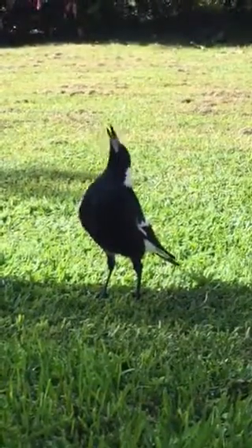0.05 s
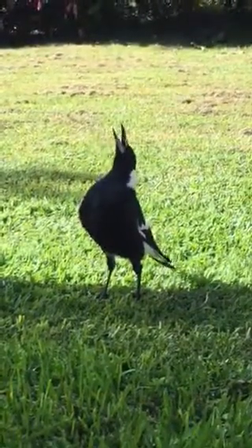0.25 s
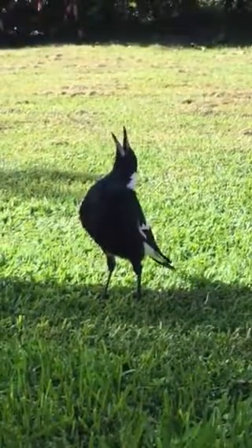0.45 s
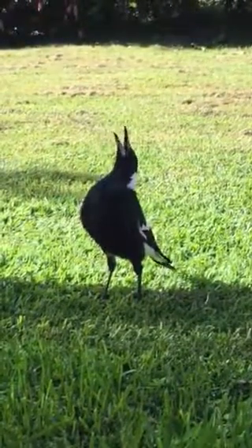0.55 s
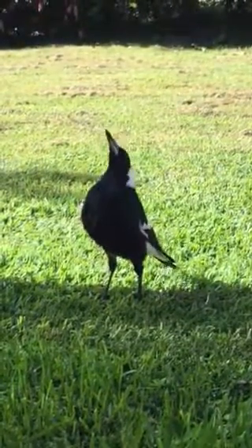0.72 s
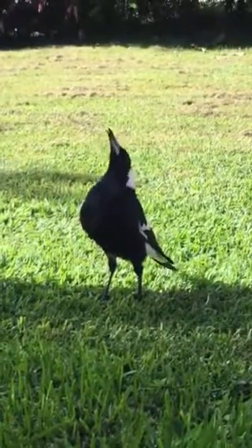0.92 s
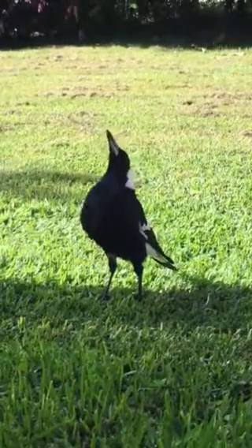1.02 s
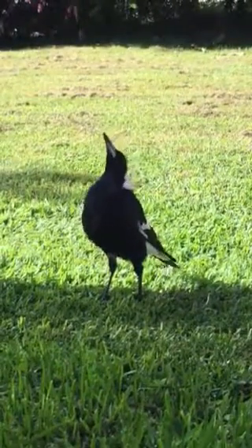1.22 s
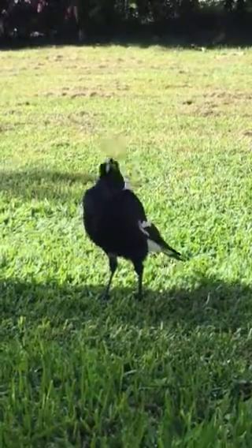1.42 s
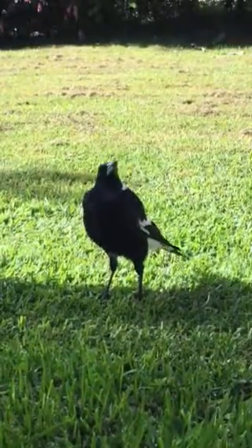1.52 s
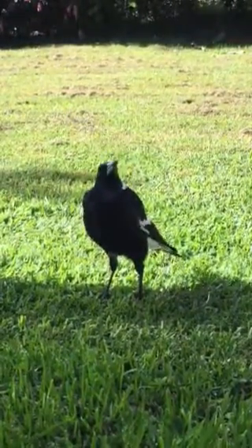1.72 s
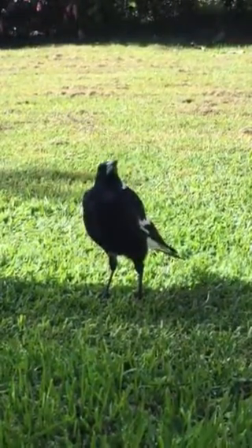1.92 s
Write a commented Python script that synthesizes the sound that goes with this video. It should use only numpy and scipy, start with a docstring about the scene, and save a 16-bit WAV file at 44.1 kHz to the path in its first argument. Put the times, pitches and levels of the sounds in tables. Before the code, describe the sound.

Loud two-voiced magpie song outdoors, short note, long fluttering phrase, soft descending end, then quiet

```python
"""Low rumble and faint hiss of a park, noise and wavering tones, lie under all; a far bird whistles first.
Then a songbird carols close by on a lawn: a short note, a long two-voiced phrase and a softer falling note.
The two sides of its syrinx sing a little apart; their coupling gives a flutter and clusters of overtones.
Sparse dull reflections follow the song."""
import sys
import numpy as np
from scipy import signal
from scipy.io import wavfile
from scipy.ndimage import uniform_filter1d

SR = 44100
rng = np.random.default_rng(int(sys.argv[2]) if len(sys.argv) > 2 else 0)


def invert_db(x):
    """Field ratio 10**(x/20) for x, a level in decibels (scalar or array-like)."""
    u = np.asarray(x, float) / 20
    return 10 ** u


def dump_mix(stems):
    """Bounce the given channels to the path in sys.argv[1] as a 16-bit WAV at rate SR."""
    frames = np.atleast_2d(stems).T  # one column per channel
    limited = np.clip(frames, -1, 1)  # hard clip at full scale
    pcm = np.round(limited * 32767).astype(np.int16)
    wavfile.write(sys.argv[1], SR, pcm)


N = 85995
T = np.arange(N) / SR


def evened(x):
    """Normalisation: divides a signal by its root mean square."""
    return x / np.sqrt(np.mean(abs(x) ** 2) + 1e-20)


def read(points, hz):
    """Spectral envelope: interpolates levels along a logarithmic frequency axis."""
    f, value = np.transpose(points)
    return np.interp(np.log(hz + 1), np.log(f + 1), value)


def turns(hz):
    """Phase is the integral of frequency: a rotating phasor follows a pitch curve."""
    return np.exp(2j * np.pi * np.cumsum(hz) / SR)


def wobble(hz, count=N):
    """Narrowband modulation: complex noise low-passed at hz, scaled to rms 1."""
    z = rng.standard_normal(count) + 1j * rng.standard_normal(count)
    return evened(signal.sosfilt(signal.butter(N=4, Wn=hz, fs=SR, output="sos"), z))


def park():
    """Spectral shaping of noise gives rumble and hiss; slow modulation makes added tones waver."""
    # spectrum of the wash: frequency_hz, relative_density_db
    density = [(18, -41.5), (30, -11.5), (159, -10), (212, -22), (357, -24.5), (464, -29.5), (1250, -28.5),
               (1580, -30.5), (2880, -30.5), (15300, -52)]
    # lumps in the distant rumble: frequency_hz, level_db
    rumble = [(55, -66), (100, -63), (158, -69)]
    # thin tones: frequency_hz, level_db
    hum = [(2557, -79), (2772, -82)]
    wash_db = -61.5  # rms
    frames, hz = N // 512 + 5, np.fft.rfftfreq(2048, 1 / SR)
    a, b, patches = rng.standard_normal((frames, 1025, 3)).T
    # patches of frequency and time in which the level differs a little
    patches = uniform_filter1d(patches, size=20, axis=0)
    patches = evened(uniform_filter1d(patches, size=5, axis=1))
    z = (a + 1j * b) * invert_db(read(density, hz)[:, None] + 1.5 * patches)
    noise = signal.istft(z, nperseg=2048, noverlap=1536)[1][:N]
    wash = invert_db(wash_db) * evened(noise)
    for f, db in rumble:
        wash = wash + invert_db(db) * (turns(np.full(N, f)) * wobble(12)).real
    for f, db in hum:
        wash = wash + invert_db(db) * (turns(np.full(N, f)) * (1 + 0.5 * wobble(6))).real
    return wash


def far_bird():
    """A gliding sinusoid with slight random modulation: a thin distant whistle."""
    # the whistle's course: time_s, pitch_hz, level_db (rms)
    whistle = [(0, 1103, -57), (.075, 1087, -51), (.092, 1044, -64), (.155, 1063, -59)]
    s, hz, db = np.transpose(whistle)
    tone = turns(np.interp(T, s, hz)) * (1 + 0.11 * wobble(25))
    return np.sqrt(2) * invert_db(np.interp(T, s, db, right=-120)) * tone.real


def echoes(x):
    """Convolution with decaying sparse impulses: dull reflections from ground and trees."""
    t60_s, dull_hz = 0.2, 3560
    taps = np.zeros(SR // 2)
    at = np.arange(200, SR // 2 - 20, 20)
    # one impulse of either sign at a random place in each 20 samples
    taps[at + rng.integers(0, 20, len(at))] = rng.choice([-1., 1.], len(at))
    taps *= invert_db(-60 * np.arange(len(taps)) / SR / t60_s)
    taps = signal.lfilter(*signal.butter(N=1, Wn=dull_hz, fs=SR), taps)
    return signal.fftconvolve(x, taps / np.linalg.norm(taps))[:N]


def beak(t, hz):
    """Resonance: the overtone gain in dB follows the shape of the beak as it moves."""
    # overtone colour of each beak shape: frequency_hz, gain_db
    wide = [(1290, -43.5), (2200, -17.5), (3680, -7.5), (4250, 10.5), (4910, -13), (5630, -28),
            (6100, -3.5), (6660, -20), (15000, -33)]
    half_open = [(2400, -16), (2930, -14), (3470, -12), (4200, 1), (5000, -9.5), (7000, -11.5), (9500, -23),
                 (10500, -43), (13000, -42.5)]
    nearly_shut = [(1300, -10.5), (1650, 3), (2200, -25), (2520, -11.5), (3200, -9.5), (3800, 2.5),
                   (4900, -27), (5750, -10), (6700, -41), (8000, -21), (10000, -22), (10800, -48),
                   (12300, -35.5)]
    # beak timing: wide_until_s, half_open_from_s, nearly shut in phrases that start before_s, after_s
    timing = [.42, .5, .2, .85]
    if not timing[2] < t[0] < timing[3]:
        return read(nearly_shut, hz)
    half = np.interp(t, timing[:2], [0, 1])
    return (1 - half) * read(wide, hz) + half * read(half_open, hz)


def phrase(table, first, last, own_db, under_db, upper_db):
    """Intermodulation of two coupled voices: overtone k is a cluster at k x pitch + m x gap."""
    ladder_db, upper_rad, mirror_rad = -13.5, -1.1, 1.9  # fall per further mirror tone; phases
    jitter, jitter_hz, rough_hz = 0.006, 80, 195  # relative pitch jitter; modulation bandwidths
    drift_depth, drift_hz = 0.2, 28  # slow wander of the mixed tones
    coupling = 0.9  # dB of mixed tone per dB of second voice or mirror tone
    above_db, below_db = -10, -8  # change per step above and below a cluster
    mixed_db, effort = 6.5, 0.24  # mixed tones' offset, and their rise in dB per dB of overtones
    inner_db = -7  # mixed tones deep in a cluster
    tilt, even_db = 0.23, -39  # duller when weak: dB per octave per dB of overtones below even_db

    start, stop = round(first * SR), round(last * SR)
    t, n = T[start:stop], stop - start
    s, *cols = np.transpose(table)
    curves = [uniform_filter1d(np.interp(t, s, c), size=150) for c in cols]
    hz, db, gap, second_db, mirror_db, rough, high_db = curves
    main = turns(hz * (1 + jitter * wobble(jitter_hz, count=n).real))
    beat = turns(gap * (1 + 8 * jitter * wobble(43, count=n).real))
    up, down, rough = invert_db(second_db), invert_db(mirror_db), np.clip(rough, 0, 1)

    # main voice, second voice and the tone above it
    pair = 1 + up * beat + invert_db(upper_db) * up * np.exp(1j * upper_rad) * beat ** 2
    # mirror tones step down below the main voice
    for j in range(4):
        mirror = down * invert_db(ladder_db * j) * np.exp(1j * mirror_rad) / beat ** (j + 1)
        pair = pair + mirror * (wobble(60, count=n) if j else 1)
    roughened = 1 + 0.5 * rough * wobble(rough_hz / 2, count=n)
    low = invert_db(db) * (main * pair * roughened).real

    steps = {m: beat ** m for m in range(-4, 21)}
    drift = [(1 + drift_depth * wobble(drift_hz, count=n)) / np.sqrt(1 + drift_depth ** 2)
             for _ in range(8)]
    high, power = np.zeros(n), np.zeros(n)
    for k in range(2, 19):
        cluster, share = 0, np.clip(rough * k, 0, 1)
        for m in range(-4, k + 3):
            own = m in (0, k)  # a true overtone of one voice
            if m > 0:
                mix_db = coupling * second_db + above_db * max(m - k, 0)
            elif m < 0:
                mix_db = coupling * mirror_db + under_db + below_db * (-m - 1)
            else:
                mix_db = np.full(n, float(own_db))
            if not own:
                mix_db = mix_db + mixed_db + effort * high_db
            if 1 < m < k:
                mix_db = mix_db + inner_db
            mix_db = mix_db + tilt * np.minimum(high_db - even_db, 0) * np.log2(k)
            # gain is set every 50 samples; no tones from 15400 Hz up
            f = (k * hz + m * gap)[::50]
            gain = invert_db(beak(t[::50], f) + mix_db[::50]) * (f < 15400)
            gain = np.repeat(gain, 50)[:n]
            phase = np.exp(2j * np.pi * rng.random())
            wander = 1 if own else drift[rng.integers(len(drift))]
            cluster = cluster + gain * steps[m] * phase * wander
            power += gain ** 2 / 2
        # roughness trades steady tone for noise, more so in higher overtones
        texture = np.sqrt(1 - share ** 2) + share * wobble(rough_hz, count=n)
        high += (cluster * main ** k * texture).real

    fade = signal.windows.tukey(n, 400 / n)
    out = np.zeros(N)
    out[start:stop] = (low + invert_db(high_db) * high / np.sqrt(power)) * fade
    return out


def singer():
    """Source and filter: three syrinx phrases pass a throat that high-passes below the song."""
    # course of each phrase: time_s, pitch_hz, level_db (main voice), gap_hz (to second voice),
    # second_db and mirror_db (re main voice), roughness (0-1), overtones_db
    opening = [(0.149, 1290, -64, 119, -8, -8.5, 0.08, -81.5), (0.164, 1269, -41, 121.2, -8.5, 1, 0.3, -62),
               (.2, 1258, -28.5, 113, -22, -7, 0.15, -43),
               (0.221, 1231, -18.5, 107.8, -34.5, -16, 0.2, -39.5),
               (0.244, 1156, -10.5, 134, -21, -25.5, 0, -40.5),
               (0.263, 1161, -14.5, 104, -6, -20.5, 0.3, -40),
               (0.282, 1208, -31.5, 108.4, -9.5, -35.5, 0.1, -48),
               (.292, 1220, -61, 110.5, -18.5, -21.5, 0.1, -62.5)]
    carol = [(0.254, 1489, -56.5, 90.9, -21, -35.5, 0.35, -68.5),
             (0.269, 1594, -38.5, 90.3, -19, -14.5, 0.91, -43),
             (0.286, 1322, -23.5, 86.2, -33.5, -19.5, 0.3, -40.5),
             (0.296, 1280, -18, 88.7, -36, -37, 0.017, -32.5),
             (.32, 1236, -10, 86.15, -41.5, -20.5, 0.017, -30.5),
             (0.342, 1216, -10, 67.45, -26, -39.5, 0.015, -31),
             (0.361, 1214, -4, 80, -46.5, -58.5, 0.01, -34.5),
             (.39, 1206, -8, 85.5, -35, -57, 0.039, -27.5),
             (.403, 1189, -6, 88.6, -31.5, -33.5, 0.051, -34),
             (0.409, 1179, -25.5, 459.4, -32, -50, 0.37, -34.5),
             (0.433, 1196, -25.5, 473.3, -30, -49, .6, -35), (.44, 1144, -22.5, 462, -17, -47, 0.53, -34),
             (0.454, 1208, -27.5, 412.5, -2, -57.5, 0.14, -34.5),
             (.473, 1442, -28, 162.9, 3.5, -40, 0.081, -38.5),
             (.5, 1461, -27.5, 130.3, 3.5, -12.5, 0.052, -36.5),
             (.54, 1464, -28, 108, 3.5, -11.5, 0.067, -32), (0.58, 1437, -16, 111.2, -2, -12, 0.052, -28),
             (.65, 1392, -15, 118, -2, -14, 0.069, -25.5), (0.682, 1322, -11, 112.1, -7, -21.5, 0.066, -24),
             (0.742, 1254, -10, 81.2, -10.5, -24.5, 0.082, -26.5),
             (0.767, 1240, -14, 65.2, -6, -18, 0.072, -32), (0.784, 1203, -17.5, 69.2, -6, -15, 0.081, -38),
             (0.805, 1196, -33.5, 86, 3, -43.5, 0.16, -50.5),
             (0.864, 1259, -49.5, 69.3, -28.5, -9, 0.2, -63)]
    closing = [(.862, 1060, -50, 140.3, -18, -15.5, 0.23, -62),
               (0.891, 1058, -31, 129.5, -20, -16.5, 0.067, -58.5),
               (0.924, 1031, -30.5, 116.7, -8.5, -10, .12, -59),
               (0.952, 1012, -17.5, 97.1, -31.5, -27.5, 0.038, -56),
               (0.99, 992, -14, 111.6, -19, -34.5, 0.12, -52),
               (1.058, 966.5, -14.5, 111.5, -15, -24, 0.082, -36.5),
               (1.077, 930.5, -21, 101.4, -9.5, -23.5, 0.08, -36),
               (1.129, 915, -22.5, 92.55, -5.5, -18, 0.052, -38),
               (1.189, 864.5, -28.5, 75.8, -3, -16.5, 0.047, -41),
               (1.248, 846.8, -29.5, 68, -5.5, -14.5, 0.092, -42.5),
               (1.302, 869.7, -32, 57.8, -4.5, -6, 0.19, -50), (1.319, 848, -53, 53.5, -4, -13, 0.33, -70),
               (1.4, 874, -62, 34.5, -2, -24, 0.3, -100.5)]
    # balance, a row per phrase: own_db (main voice's overtones), under_db (tones under each overtone),
    # upper_db (tone above the second voice)
    balance = [(-2.3, -2.4, -17.5), (-6.5, -0.5, -22), (-3.4, 11.5, -11.5)]
    throat_hz = 674
    song = phrase(opening, 0.15, 0.292, *balance[0])
    song = song + phrase(carol, 0.255, 0.865, *balance[1])
    song = song + phrase(closing, 0.862, 1.4, *balance[2])
    return signal.sosfilt(signal.butter(N=4, Wn=throat_hz, btype="high", fs=SR, output="sos"), song)


def scene():
    """Superposition: the bird, its echoes, the far bird and the park add up."""
    echo_db = -23
    bird = singer()
    return (bird + invert_db(echo_db) * echoes(bird) + far_bird() + park())[None]


def band_limit(x):
    """A steep low-pass at the top of the band."""
    return signal.sosfilt(signal.butter(12, 15430, fs=SR, output="sos"), x)


def record(dry):
    """High-pass response: a microphone drops the deepest bass."""
    mic_hz = 44
    mic = signal.sosfilt(signal.butter(N=3, Wn=mic_hz, btype="high", fs=SR, output="sos"), dry)
    return band_limit(mic)


dry = scene()
out = record(dry)
dump_mix(out)
```